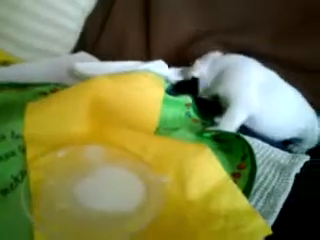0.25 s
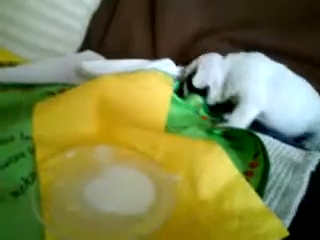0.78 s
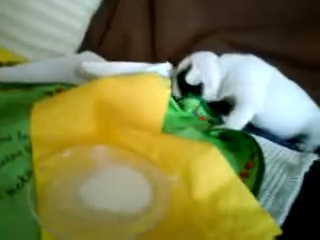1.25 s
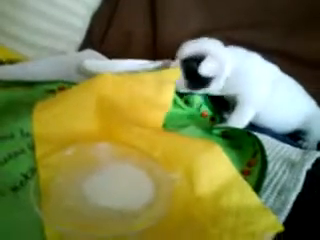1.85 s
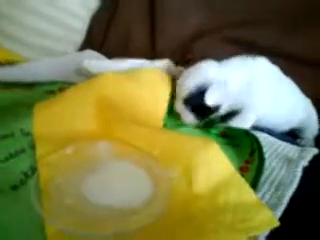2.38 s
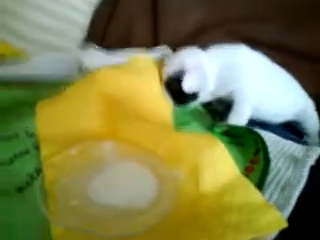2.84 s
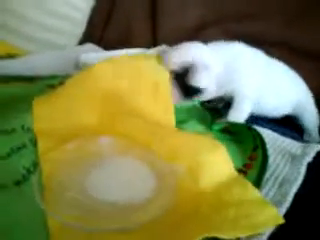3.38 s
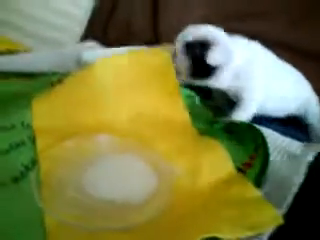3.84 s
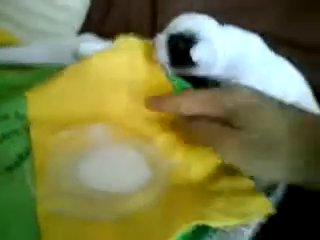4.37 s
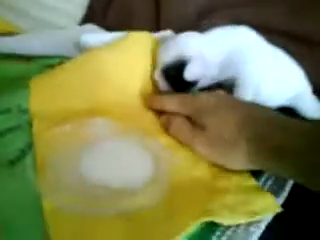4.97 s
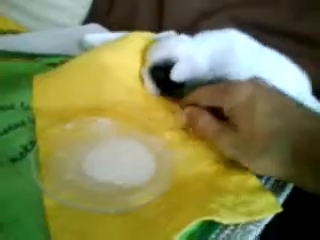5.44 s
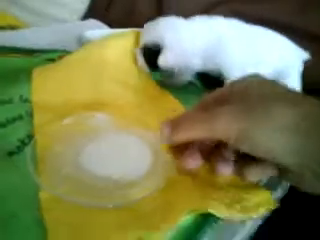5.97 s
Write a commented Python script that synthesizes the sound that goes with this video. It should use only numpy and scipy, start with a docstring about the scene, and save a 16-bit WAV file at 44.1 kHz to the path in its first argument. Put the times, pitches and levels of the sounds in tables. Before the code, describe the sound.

Cloth rubs and snaps close by as a kitten noses about, then a short mew, a longer distant meow and light plastic ticks.

```python
"""A kitten noses about on cloth-covered bedding, close to a small hand-held camera's microphone.
The fabric rubs and snaps taut, and the mattress thuds. A short, high mew rings through the room, then
another cat further off gives a long falling meow: vocal-fold harmonics shaped by throat and mouth.
Near the end a hand brushes the cloth and ticks against a plastic bowl.
Behind it all lie steady hiss, camera rumble, faint distant swells and a few thin squeaks."""
import sys
import numpy as np
from scipy import signal
from scipy.fft import rfft, irfft, next_fast_len
from scipy.io import wavfile
from scipy.ndimage import map_coordinates

SR = 44100
rng = np.random.default_rng(int(sys.argv[2]) if len(sys.argv) > 2 else 0)


def put_to_file(sound):
    """Save the sound as 16-bit audio at rate SR, in the file named by the first command-line argument."""
    columns = np.atleast_2d(sound).T  # one column per channel
    safe = np.clip(columns, -1, 1)
    whole_steps = np.round(safe * 32767)
    wavfile.write(sys.argv[1], SR, whole_steps.astype(np.int16))


N = 274081
TIME = np.arange(N) / SR


def amp(db):
    """Decibels to gain."""
    return 10 ** (np.asarray(db) / 20)


def unit(x):
    """Scale to rms 1."""
    return x / np.sqrt(np.mean(x ** 2) + 1e-20)


def along(points, hz):
    """Read (frequency [Hz], value) points on a log axis."""
    freqs, values = np.transpose(points)
    return np.interp(np.log(hz + 1), np.log(freqs + 1), values)


def curves(rows):
    """One value per sample for each column after the time."""
    times, *columns = np.transpose(rows)
    return [np.interp(TIME, times, column) for column in columns]


def wobble(rate):
    """A smooth random curve, rate knots a second."""
    return map_coordinates(rng.standard_normal(int(N * rate / SR) + 4), [TIME * rate])


def filtered(x, response):
    """Weight the spectrum of x by a function of frequency."""
    size = next_fast_len(N + SR // 2)
    return irfft(rfft(x, size) * response(np.fft.rfftfreq(size, 1 / SR)), size)[:N]


def noise(spectrum):
    """Coloured noise of rms 1."""
    return unit(filtered(rng.standard_normal(N), lambda hz: amp(along(spectrum, hz))))


def gate(start, end, edge):
    """Opens from start to end, with ramps edge seconds long."""
    return np.clip(np.minimum(TIME - start, end - TIME) / edge + .5, 0, 1)


def ring(modes, rise):
    """Damped sines after a contact that builds over rise seconds, peak 1."""
    t = np.arange(SR // 10) / SR
    x = sum(amp(db - 60 * t / t60) * np.sin(2 * np.pi * hz * t) for hz, db, t60 in modes)
    x *= 1 - np.exp(-(t / rise) ** 2)
    return x / np.abs(x).max()


def add(track, s, x):
    """Mix x into the track at s seconds."""
    part = track[round(s * SR):][:len(x)]
    part += x[:len(part)]


# Hiss and handling rumble at the microphone: (frequency [Hz], relative density [dB])
HISS_SPECTRUM = [(12, -37), (20, -12.5), (60, -12), (182, -13.5), (238, -16), (398, -17.5), (872, -21),
                 (985, -21), (1420, -24), (1650, -25), (2010, -23.5), (2210, -31), (2380, -26), (7000, -33),
                 (9100, -69), (15400, -120)]
RUMBLE_SPECTRUM = [(15, 14.5), (35, 0.5), (70, -1.5), (100, -2), (170, -8.5), (300, -0.5), (500, -15.5),
                   (1000, -28.5), (3000, -70.5)]

def background(hiss_db=-53, rumble_db=-51.5, calm_s=3.65, calm_db=-4):
    """Steady hiss, and the rumble of the hand-held camera, which eases at calm_s."""
    hiss = amp(hiss_db) * noise(HISS_SPECTRUM)
    tremor_db = 2 * wobble(12)
    calm = np.clip((TIME - calm_s) / .2, 0, 1)
    return hiss + amp(rumble_db + calm_db * calm + tremor_db) * noise(RUMBLE_SPECTRUM)


def strokes(rows, spectrum, grain_db, edge):
    """Threads catch and slip in quick grains while the cloth slides."""
    pressure = sum(amp(db) * gate(s, s + length, edge) for s, length, db in rows)
    return pressure * unit(noise(spectrum) * amp(grain_db * wobble(700)))


def pat(hz):
    """A padded blow that dies within a few cycles."""
    return -ring([(hz, 0, 5 / hz), (hz * 2.2, -9, 3 / hz)], rise=.5 / hz)


# Paw or nose over the cloth, close to the microphone: (time [s], length [s], level [dB])
RUBS = [(0.155, 0.04, -38), (0.232, 0.03, -38), (0.372, .022, -38.5), (0.535, 0.009, -38.5),
        (0.694, 0.049, -34), (0.847, 0.041, -34), (0.942, 0.019, -29.5), (1.08, 0.017, -35.5),
        (1.224, 0.01, -43.5), (2.966, 0.011, -34.5), (3.282, 0.028, -39.5), (3.32, .04, -34),
        (3.483, 0.053, -34.5), (3.61, 0.054, -37), (4.577, 0.01, -44), (5.993, 0.011, -44.5)]
# Spells of fidgeting on the bedding: (time [s], length [s], rub level [dB], relative snap level [dB])
FIDGETS = [(0.011, .075, -44.5, -42), (0.307, .05, -45, -52), (3.035, .085, -54, -35.5),
           (3.394, 0.088, -44, -51)]
# Sliding cloth at close range: (frequency [Hz], relative density [dB])
CLOTH_SPECTRUM = [(40, -1.5), (150, -3.5), (450, 3.5), (800, 2), (1400, -0.5), (2200, -11), (3800, -13.5),
                  (5500, -21.5), (7000, -32)]

def rubs():
    """Each stroke lands with a soft pat and slides on; fidgeting rubs lightly and unevenly."""
    out = strokes(RUBS, CLOTH_SPECTRUM, grain_db=3, edge=.017)
    for s, _, db in RUBS:
        add(out, s, amp(db + 7.5) * pat(hz=517))
    fidgeting = strokes([row[:3] for row in FIDGETS], CLOTH_SPECTRUM, grain_db=1.5, edge=.02)
    return out + fidgeting * amp(2.5 * wobble(45))


# Close fabric snaps, each with a lighter slip just before (-) or after:
# (time [s], relative push level [dB], bright edge level [dB], slip offset [s])
SNAPS = [(0.1385, -28, -37.5, -.003), (0.3026, -50, -33.5, -.015), (0.763, -26, -40, -.006),
         (.9318, -18.5, -32.5, -0.002), (2.0094, -28, -36, -0.00077), (2.1057, -19.5, -27.5, 0.0037),
         (2.1499, -29.5, -37.5, 0.0024), (2.4802, -18, -29.5, -.008), (2.5778, -24.5, -31.5, 0.0034),
         (2.6176, -21, -31, -0.006), (2.6404, -17, -29.5, 0.0015), (2.7841, -17.5, -31, -.004),
         (2.9231, -20, -31.5, -0.011), (3.2576, -19, -27.5, -0.0086), (3.2964, -43.5, -29, -0.0014),
         (3.57, -20.5, -28, -0.0029), (3.6593, -22.5, -31, 0.00039)]

def slips(lighter_db=-5.5, fidget_snaps_per_s=55):
    """Paired snaps, and tiny ones as the kitten fidgets: (time [s], relative push [dB], edge [dB])."""
    rows = [row[:3] for row in SNAPS]
    rows += [(s + offset, push + lighter_db, edge + lighter_db) for s, push, edge, offset in SNAPS]
    for s, length, _, db in FIDGETS:
        count = max(1, round(length * fidget_snaps_per_s))
        times = s + length * (np.arange(count) + rng.random(count)) / count
        push_db = rng.normal(db, 3, count)
        rows += zip(times, push_db, push_db - 3.5)
    return rows


# Modes of a taut patch of cloth: (frequency [Hz], relative level [dB], t60 [s])
SNAP_MODES = [(705, 10, 0.004), (1240, -5, 0.0083)]
# The bright edge of a snap, heard close: (frequency [Hz], relative density [dB])
CRINKLE_SPECTRUM = [(1200, -29), (2500, -6.5), (4500, -1), (7000, -12.5), (9000, -31)]

def snaps(edge_t60_s=.0069):
    """Taut fabric lets go: one short push, and a burst of crinkling threads."""
    pushes, bursts = np.zeros(N), np.zeros(N)
    crinkle = noise(CRINKLE_SPECTRUM)
    fade = amp(-60 * np.arange(SR // 50) / SR / edge_t60_s)
    for s, push_db, edge_db in slips():
        detune = np.exp(.13 * rng.standard_normal())
        body = ring([(hz * detune, db, t60) for hz, db, t60 in SNAP_MODES], rise=.00019)
        add(pushes, s, amp(push_db + 3.5) * body)
        add(bursts, s, amp(edge_db) * fade)
    thin = filtered(pushes, lambda hz: 1j * hz / (1j * hz + 250))  # a small patch radiates little bass
    return thin + bursts * crinkle


def mattress_thud(hz=93, t60_s=.019):
    """The mattress gives under a blow."""
    return ring([(hz, 0, t60_s)], rise=.007)


def knock(s=.6945, db=-8.5, hz=1230, thud_db=-27):
    """One hard knock near the microphone swells and dies within a few cycles, over a mattress thud."""
    out = np.zeros(N)
    cycles = np.arange(SR // 10) / SR * hz
    swell = (cycles * np.exp(1 - cycles)) ** 3
    blow = swell * np.cos(2 * np.pi * (cycles - .5))
    after_ring = amp(-7.5) * ring([(760, 0, .0052)], rise=.00055)
    add(out, s, amp(db) * (blow + after_ring) + amp(thud_db) * mattress_thud())
    return out


# Landings near the microphone: (time [s], pat peak [dB], pitch [Hz], thud peak [dB])
BUMPS = [(0.8788, -18.5, 520, -30), (0.8834, -16.5, 466, -44), (.888, -19, 271, -33),
         (1.510, -18, 448, -41.5), (2.974, -22.5, 444, -48.5), (3.501, -19, 620, -50),
         (3.571, -18, 400, -42.5), (3.623, -20, 350, -29), (3.662, -18.5, 398, -37)]

def bumps():
    """Weight lands on the bedding: a padded blow, with the mattress thudding below."""
    out = np.zeros(N)
    for s, db, hz, thud_db in BUMPS:
        add(out, s, amp(db) * pat(hz) + amp(thud_db) * mattress_thud())
    return out


# Faint swells far from the microphone: (crest time [s], level [dB], rise [s], fade [s])
SWELLS = [(1.42, -54.5, 0.11, 0.38), (2.559, -44.5, 0.052, 0.12), (4.65, -51.5, 0.33, 0.5),
          (5.38, -47.5, 0.056, 0.08)]
# Their tone from the bedside: (frequency [Hz], relative density [dB])
SWELL_SPECTRUM = [(500, -6), (1200, -8), (1700, -4), (2080, -1), (2450, -13), (3200, -15), (7000, -34)]

def distant_swells():
    """Distant sound, strongest near 2 kHz, swells and fades: perhaps far-off squeaks or mews."""
    swells = sum(amp(db) * np.exp(-np.maximum((s - TIME) / rise, (TIME - s) / fade))
                 for s, db, rise, fade in SWELLS)
    return swells * amp(.94 * wobble(25)) * noise(SWELL_SPECTRUM)


# Faint squeaks in the room: (time [s], length [s], pitch [Hz], level [dB])
SQUEAKS = [(1.347, .42, 2025, -64), (2.513, 0.068, 2250, -45.5), (3.195, .04, 1915, -42),
           (5.352, 0.082, 2150, -49.5)]

def squeaks(sag=.042, jitter=.018):
    """Thin, unsteady whistles that sag a little in pitch."""
    out = np.zeros(N)
    for s, length, hz, db in SQUEAKS:
        progress = np.clip((TIME - s) / length, 0, 1)
        pitch = hz * (1 - sag * progress + jitter * wobble(150))
        out += amp(db) * np.sin(2 * np.pi * np.cumsum(pitch) / SR) * gate(s, s + length, .015)
    return room(out, wet_db=-1.5)


# Turbulent air in the calling cat's throat: (frequency [Hz], relative density [dB])
RASP_SPECTRUM = [(700, -36), (1600, -2), (2500, 0), (3000, -10), (4000, -3), (5500, -7), (7000, -13)]

def voice(pitch, level_db, span, throat, jitter, flutter_db, rasp_db):
    """The vocal folds' unsteady harmonics slide through the resonances of the throat."""
    pitch = pitch * (1 + jitter * wobble(170))
    phase = 2 * np.pi * np.cumsum(pitch) / SR
    orders = np.arange(1, 11)[:, None]
    gains = amp(along(throat, orders * pitch))
    tone = (gains * np.sin(orders * phase)).sum(0)
    tone /= np.sqrt((gains ** 2).sum(0) / 2)  # rms 1 at every pitch
    rasp = amp(rasp_db) * noise(RASP_SPECTRUM) * (1 + np.cos(phase))  # air escapes once a cycle
    return (tone + rasp) * amp(level_db + flutter_db * wobble(80)) * gate(*span, .011)


# The mew arches up and sinks back: (time [s], pitch [Hz])
MEW = [(2.595, 651), (2.66, 719.5), (2.688, 851), (2.712, 866.5), (2.732, 822.6), (2.753, 791.4),
       (2.764, 704), (2.92, 586)]
# Throat and mouth in the mew: (frequency [Hz], relative gain [dB])
MEW_THROAT = [(300, -42.5), (620, -8.5), (850, -26.5), (1230, 5), (1400, -13), (1700, 2), (2080, -2),
              (2500, -12), (3200, -31), (4200, -30.5), (5200, -31.5), (7000, -53.5)]

def mew(top_db=-13, floor_db=-41, db_per_octave=95.5):
    """A short cry rings in the room; effort raises loudness and pitch together."""
    pitch, = curves(MEW)
    effort_db = top_db + db_per_octave * np.log2(pitch / pitch.max())
    level_db = 20 * np.log10(amp(effort_db) + amp(floor_db))
    span = MEW[0][0], MEW[-1][0]
    cry = voice(pitch, level_db, span, MEW_THROAT, jitter=.02, flutter_db=2.6, rasp_db=-32)
    return room(cry, wet_db=-3)


# The course of the long meow: (time [s], pitch [Hz], level [dB])
MEOW = [(3.5, 611, -43), (3.56, 630, -30), (3.6, 686.4, -28.5), (3.7, 639.5, -33), (3.78, 671, -29.5),
        (3.94, 631, -35), (4.0, 599.5, -40), (4.13, 569.8, -38.5), (4.19, 502, -38.5), (4.25, 482.6, -37.5),
        (4.36, 452, -44.5)]
# Throat and mouth in the meow: (frequency [Hz], relative gain [dB])
MEOW_THROAT = [(250, -27), (470, -7.5), (660, -14), (950, -10), (1350, 2), (1600, 2.5), (1950, -10.5),
               (2500, -30.5), (3200, -26), (4000, -32.5), (6000, -43)]

def meow():
    """Another cat, further from the microphone: a softer, rougher, falling cry, smeared by the room."""
    pitch, level_db = curves(MEOW)
    span = MEOW[0][0], MEOW[-1][0]
    cry = voice(pitch, level_db, span, MEOW_THROAT, jitter=.024, flutter_db=2.4, rasp_db=-33)
    return room(cry, wet_db=.5)


# Fur passing close to the microphone: (time [s], length [s], level [dB])
SWISHES = [(3.715, 0.05, -43), (4.14, .12, -53)]
# Fur on fabric: (frequency [Hz], relative density [dB])
SWISH_SPECTRUM = [(1500, -32), (2500, -13), (3300, -15.5), (4350, -9), (5000, -18.5), (7000, -23)]

def fur_swishes():
    """Fur slides over the fabric with a light swish."""
    return strokes(SWISHES, SWISH_SPECTRUM, grain_db=2, edge=.022)


# A hand on the bedding, close by: (time [s], length [s], level [dB])
PRESSES = [(4.53, 0.174, -55), (4.79, 0.2, -52.5)]
# Bedding under the hand: (frequency [Hz], relative density [dB])
PRESS_SPECTRUM = [(60, -24), (170, 7), (240, -6), (320, -1.5), (500, -10), (1200, -19), (3000, -60)]

def hand_presses():
    """The hand presses into the bedding with a dull scuff."""
    return strokes(PRESSES, PRESS_SPECTRUM, grain_db=1, edge=.052)


# Fingers on the bowl, with a little room around them: (time [s], relative level [dB])
TICKS = [(5.0725, -25), (5.0798, -29.5), (5.3866, -22), (5.713, -24.5), (6.014, -23.5)]
# The plastic bowl's resonances: (frequency [Hz], relative density [dB])
BOWL_SPECTRUM = [(200, -26), (1100, -3), (1700, -6.5), (2350, 7.5), (3400, -13.5), (5200, -2),
                 (7000, -12.5)]

def bowl_ticks(t60_s=.011):
    """Each tick is a dry crack of thin plastic, damped by the fingers."""
    decay = sum(amp(db - 60 * np.abs(TIME - s) / t60_s) * (TIME >= s) for s, db in TICKS)
    return room(amp(-5.5) * decay * noise(BOWL_SPECTRUM), wet_db=-9)


# Reverberation of the room around the bedding: (frequency [Hz], t60 [s])
ROOM_DECAY = [(300, .6), (1700, 0.53), (3000, 0.39), (7000, 0.59)]

def room(x, wet_db):
    """Direct sound plus a diffuse tail, at about the same overall power."""
    hz, t, bands = signal.stft(rng.standard_normal(SR), SR, nperseg=256)
    decay = amp(-60 * t / along(ROOM_DECAY, hz)[:, None])
    _, tail = signal.istft(bands * decay, SR, nperseg=256)
    tail = np.pad(tail, (SR // 250, 0))  # 4 ms behind the direct sound
    freqs = np.fft.rfftfreq(len(tail), 1 / SR)
    midband = rfft(tail)[(freqs > 1000) & (freqs < 3000)]
    tail /= np.sqrt(np.mean(np.abs(midband) ** 2))
    return (x + amp(wet_db) * signal.fftconvolve(x, tail)[:N]) / np.hypot(1, amp(wet_db))


def scene():
    """From beside the bedding: the cloth is close and nearly dry, while the calls fill the room."""
    close = rubs() + snaps() + knock() + bumps() + fur_swishes() + hand_presses()
    around = background() + distant_swells() + squeaks() + mew() + meow() + bowl_ticks()
    return (room(close, wet_db=-23) + around)[None]


def record(dry, top_hz=7000):
    """The camera's single microphone channel cuts off steeply above top_hz."""
    return filtered(dry[0], lambda hz: 1 / np.sqrt(1 + (hz / top_hz) ** 90))[None]


dry = scene()
out = record(dry)
put_to_file(out)
```